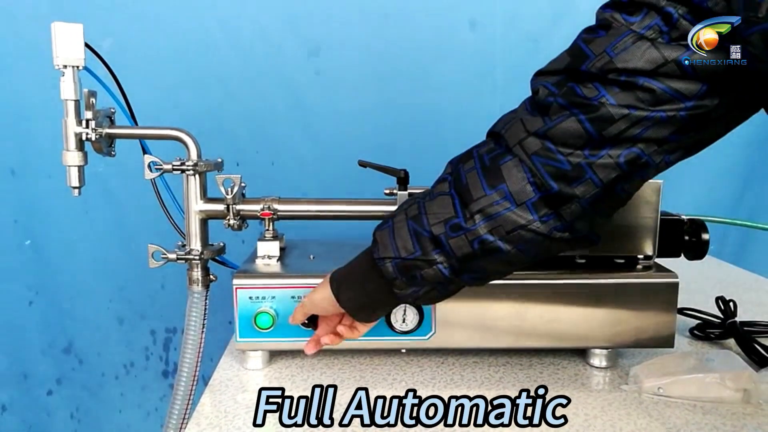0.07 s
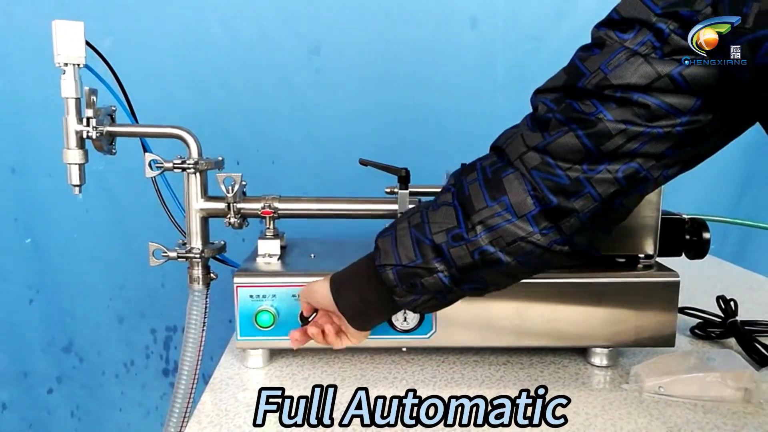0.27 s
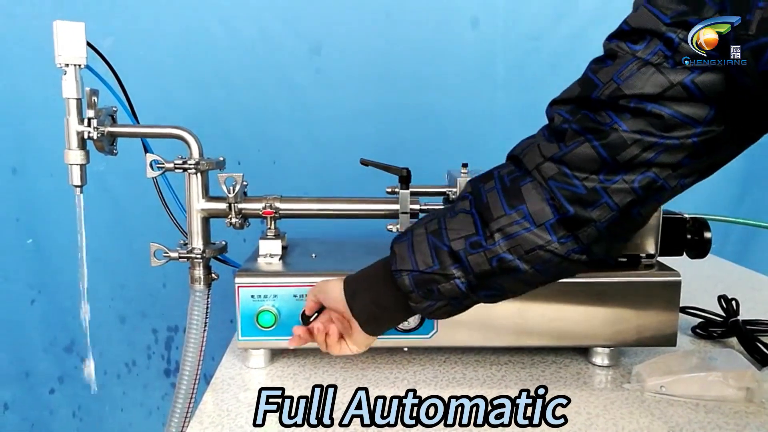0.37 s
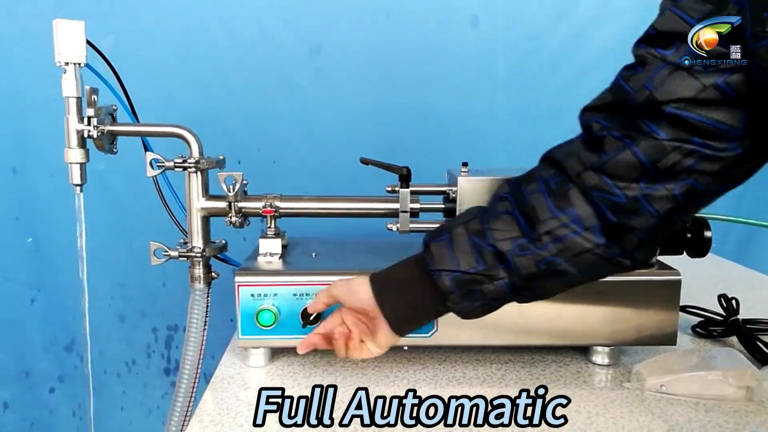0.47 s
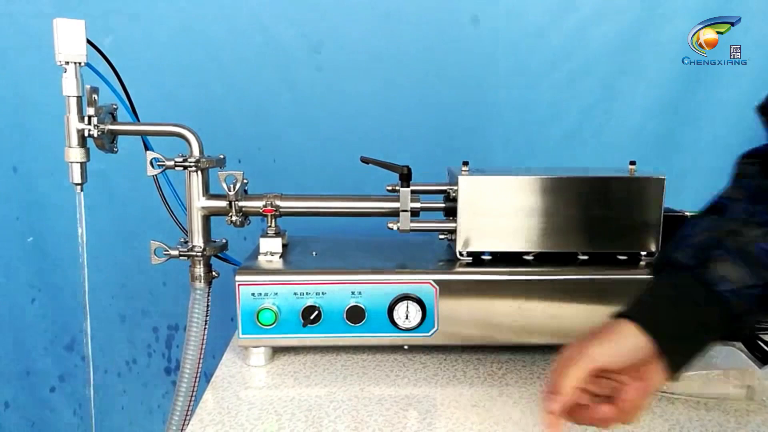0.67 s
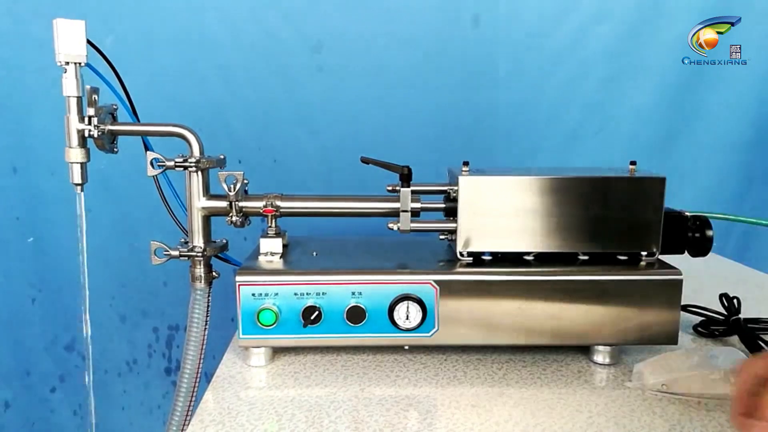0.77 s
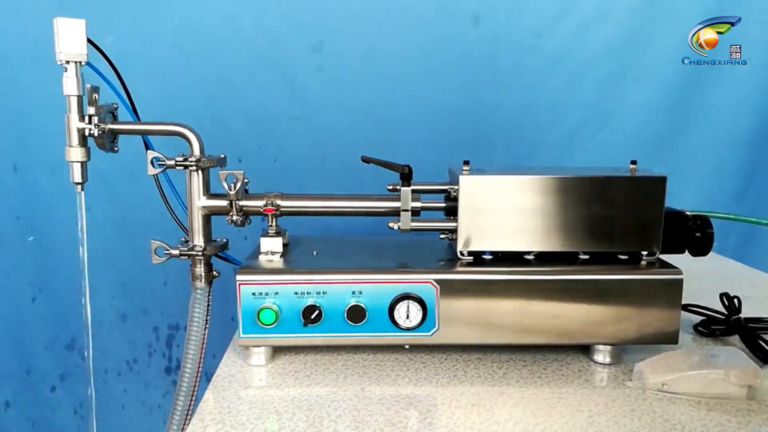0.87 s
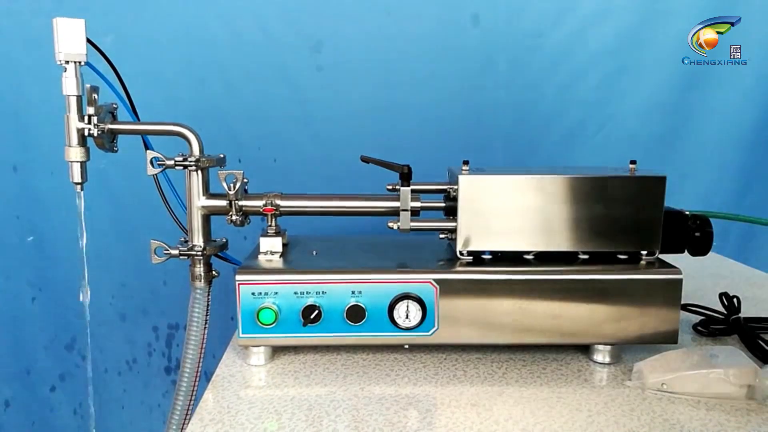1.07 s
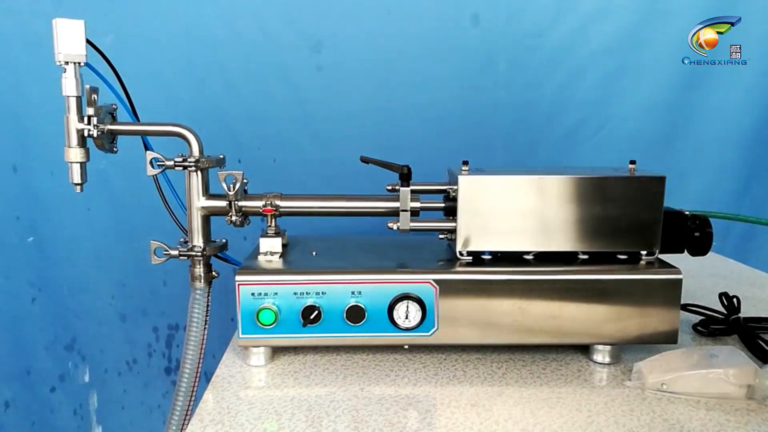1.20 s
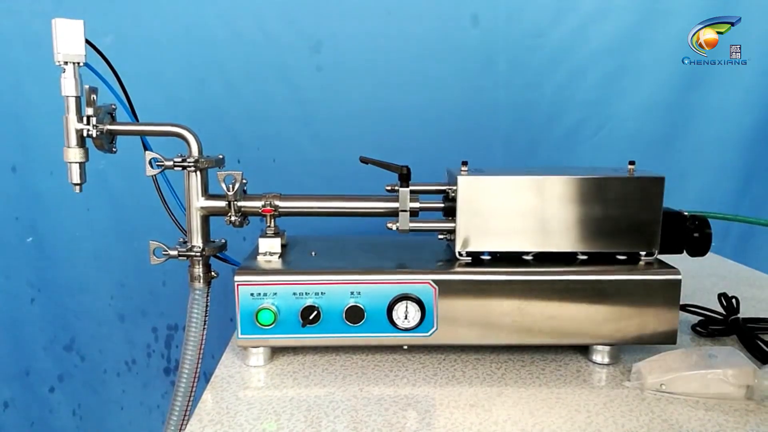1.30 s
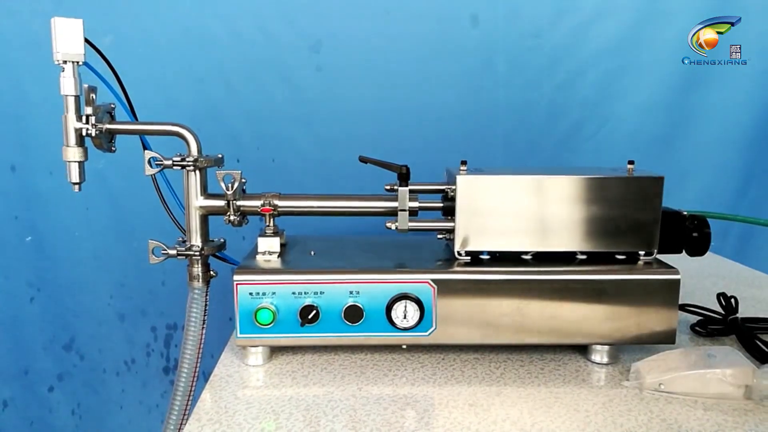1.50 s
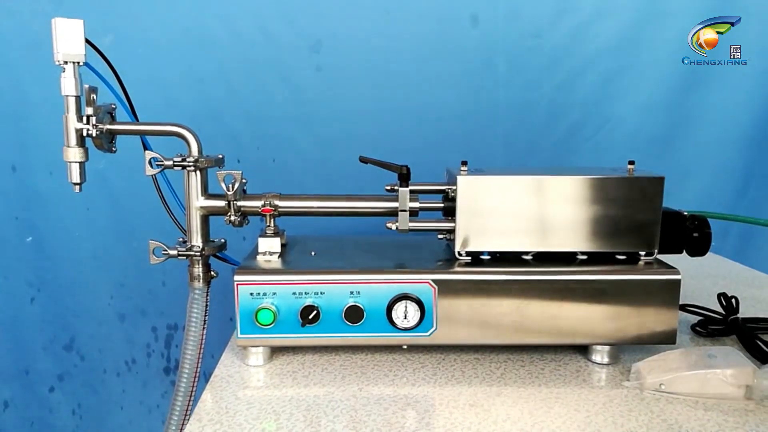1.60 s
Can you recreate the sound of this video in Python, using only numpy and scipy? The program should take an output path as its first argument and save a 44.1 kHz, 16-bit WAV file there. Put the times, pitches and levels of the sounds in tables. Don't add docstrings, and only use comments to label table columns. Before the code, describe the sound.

Compressed air hisses from a benchtop piston filling machine, close up in a quiet room. After near silence, at 0.25 seconds a sharp air burst and piston slam thud into the bench, steel pinging. Steady bright hiss continues over faint liquid patter, dips near 1.0 with a small valve tick, then a second slam and burst at 1.09 leads into a ringing, slightly whistling hiss, the splashing ending around 1.4.

```python
import sys
import numpy as np
from scipy import signal
from scipy.fft import rfft, irfft
from scipy.io import wavfile
from scipy.ndimage import uniform_filter1d

SR = 44100
rng = np.random.default_rng(int(sys.argv[2]) if len(sys.argv) > 2 else 0)


def rack_gain(trim_db):
    fader = np.asarray(trim_db, float)
    return 10 ** (fader / 20)


def pcm_store(signal):
    levels = np.round(np.clip(np.atleast_2d(signal), -1, 1) * 32767)
    wavfile.write(sys.argv[1], SR, levels.astype(np.int16).T)


N = 72765
T = np.arange(N) / SR

# f/Hz, level/dB
ROOM_COLOUR = [(20, -7), (35, -6.5), (60, -11), (250, -18), (1000, -16), (2500, -19.5), (4500, -28),
               (10000, -37)]
# f/Hz, level/dB
ROOM_HUMS = [(541, -77), (1240, -88), (1615, -85)]
# f/Hz, level/dB
PATTER_COLOUR = [(100, -47.5), (200, 2), (300, -10.5), (450, -4), (680, -9), (900, 2), (1300, -39),
                 (2000, -47)]
# t/s, level/dB, length/s, centre f/Hz
SPLASHES = [(0.297, -47.5, 0.15, 890), (0.478, -62, 0.069, 245), (0.594, -59.5, 0.076, 222),
            (0.673, -61, 0.22, 333), (0.828, -53.5, 0.067, 244), (0.835, -52, 0.067, 760),
            (0.868, -57.5, 0.06, 610), (0.965, -51, 0.043, 765), (1.035, -56, 0.176, 373),
            (1.139, -46, 0.072, 970), (1.257, -56, 0.11, 270), (1.267, -61, 0.088, 820),
            (1.326, -57.5, 0.14, 265), (1.025, -64, .06, 201), (0.703, -62, 0.086, 720),
            (1.407, -68.5, 0.092, 266)]
# t/s, level/dB, f/Hz, length/s
BENCH_REBOUNDS = [
    (0.24, -34.5, 176, 0.011),
    (0.263, -42, 254, 0.034),
    (0.288, -38, 257, 0.02),
    (1.072, -47, 245, 0.028),
    (1.103, -42, 257, 0.02),
    (1.127, -34, 233, 0.013),
    (1.139, -38, 246, 0.024),
    (1.156, -51, 248, 0.018),
]
# t/s, level/dB, f/Hz, t60/s
VALVE_PINGS = [(.2535, -29, 1950, .04), (.256, -33, 800, .03), (.2667, -20, 2550, .03),
               (.2775, -28, 2550, .04), (.283, -28, 2520, .07), (.303, -32, 2550, .04),
               (.308, -37, 900, .06), (1.0928, -20, 1480, .032), (1.096, -28, 2200, .06),
               (1.109, -32, 1930, .06), (1.125, -29, 1420, .04), (1.129, -31, 1915, .12),
               (1.136, -33, 1915, .07)]
# t/s, thud level/dB, bench f/Hz, crack level/dB
PISTON_SLAMS = [
    (.2533, -20, 228, -27),
    (1.0925, -20.5, 228, -29),
]
# f/Hz, level/dB
BENCH_COLOUR = [(60, -15), (130, -1.5), (200, -1.5), (260, 6), (330, -18), (500, -24.5), (900, -20),
                (1500, -43)]
# f/Hz, level/dB, t60/s
STEEL_MODES = [(524, -3, 0.036), (730, -3, 0.039), (1970, 0, 0.05), (2750, -4, .045), (3920, 7, 0.069),
               (4370, -8, .05), (5100, -3, .09), (5400, 3, 0.088)]
# t/s, level/dB
EXHAUST_FLOW = [(.21, -72), (.235, -55.5), (.27, -41), (.55, -41), (.7, -39.5), (.985, -39.5),
                (1.005, -44.5), (1.07, -47), (1.1, -37.5), (1.3, -41.5), (1.65, -42.5)]
# f/Hz, level/dB
PUSH_COLOUR = [(530, -28), (900, -8), (1840, -3), (2120, -6), (3340, -7.5), (5370, -8.5), (7150, -13.5),
               (11900, -19), (15500, -24)]
# f/Hz, level/dB
PULL_COLOUR = [(530, -43), (900, -12), (1470, -2), (2720, 2.5), (3220, -4), (5370, 1), (7500, -7),
               (13600, -14.5), (15500, -20.5)]
# f/Hz, width/Hz, level/dB
PUSH_RESONANCES = [(1290, 50, -8), (1500, 100, -5), (2130, 80, -1), (2500, 120, -8), (2760, 110, -1),
                   (3920, 80, -5), (4290, 200, -3), (5350, 240, -5), (6280, 60, -11), (7770, 200, -15),
                   (9400, 800, -12), (11900, 900, -15)]
# f/Hz, width/Hz, level/dB
PULL_RESONANCES = [(1502, 37, 4), (2140, 44, 0.5), (2276, 29, 0.5), (2690, 80, 3.5), (2776, 35, 6),
                   (4015, 44, -0.5), (4340, 57, -5), (4580, 65, -1), (5400, 45, -0.5), (5420, 125, 2),
                   (6187, 70, 0.5), (9200, 770, -10), (11630, 740, -8.5), (13260, 1600, -11)]
# slam t/s, lead/s, lead-in level/dB, peak level/dB, hold/s
VALVE_BLASTS = [
    (0.2511, 0.021, -9, -22.5, 0.012),
    (1.0946, 0.022, -12, -24.5, 0.0059),
]
# f/Hz, level/dB
BLAST_COLOUR = [(180, -32), (300, 7.5), (769, -9), (2520, -6), (4800, -15.5), (5390, -3), (7140, -10.5),
                (11700, -24), (15500, -10)]
# f/Hz, width/Hz, level/dB
BLAST_RESONANCES = [(1650, 240, -2.5), (2680, 360, -4.5), (4100, 600, -2.5), (5290, 230, 4.5),
                    (9370, 1570, -1.5), (12000, 2550, -1.5), (13600, 1600, -8)]
# f/Hz, left minus right level/dB
LEFT_MINUS_RIGHT = [(400, -7.5), (700, -5), (1000, -12.5), (1400, -2.5), (2400, -8.5), (4300, -5), (5500, -16.5),
                    (7500, -51), (15000, -43)]
# t/s, centre f/Hz, depth/dB
CARRIAGE_NOTCH = [(.36, 600, -15), (.43, 546, 16), (0.551, 486, 14), (.6, 590, 2.5), (.67, 596, 2.5),
                  (.78, 820, 13), (.82, 814, 0), (.9, 905, 1.5), (.94, 950, 2), (1.0, 1050, 2.5),
                  (1.201, 586, -1), (1.28, 595, 7), (1.36, 610, 0), (1.5, 595, -4)]


def read(points, hz):
    f, value = np.transpose(points)
    return np.interp(np.log(hz + 1), np.log(f + 1), value)


def evened(x):
    return x / np.sqrt(np.mean(x ** 2) + 1e-20)


def drift(shape, size):
    return evened(uniform_filter1d(rng.standard_normal(shape), size=size))


def colour(x, points):
    gain = rack_gain(read(points, np.fft.rfftfreq(x.shape[-1], 1 / SR)))
    return irfft(rfft(x) * gain, x.shape[-1])


def scattered(x):
    longest_s = 0.002
    hz = np.fft.rfftfreq(2 * N, 1 / SR)
    delay = longest_s * np.interp(hz, np.linspace(0, SR / 2, 300), rng.random(300))
    phase = -2 * np.pi * np.cumsum(delay) * hz[1]
    left = irfft(rfft(x[0], 2 * N) * np.exp(1j * phase) * rack_gain(read(LEFT_MINUS_RIGHT, hz)))[:N]
    return rack_gain(3.5) * np.array([left, x[1]])


def hollowed(x):
    width_octaves = 0.3
    hz, t, z = signal.stft(x, SR, nperseg=1024)
    s, centre, depth_db = np.transpose(CARRIAGE_NOTCH)
    away = np.log2((hz[:, None] + 1) / np.interp(t, s, centre)) / width_octaves
    notch_db = np.interp(t, s, np.maximum(depth_db, 0)) * np.exp(-away ** 4)
    return signal.istft(z * rack_gain(-notch_db), nperseg=1024)[1][:, :N]


def room():
    level_db, hum_fade_db_per_s = -69.5, 12
    hum = np.zeros((2, N))
    for hz, db in ROOM_HUMS:
        hum += rack_gain(db + 3) * np.sin(2 * np.pi * (hz * T + rng.random((2, 1)) * 0.1))
    hum *= rack_gain(-hum_fade_db_per_s * np.maximum(T - VALVE_BLASTS[0][0], 0))
    noise = rng.standard_normal((3, N))
    low = colour(noise[2] - noise[:2], [(80, 0), (130, -30)])
    return rack_gain(level_db + 2.5) * evened(colour(noise[:2] + low, ROOM_COLOUR)) + hum


def liquid():
    patter_db, start_s, end_s = -59.5, 0.25, 1.347
    lumps = rack_gain(4.0 * drift((2, N), 900))
    out = rack_gain(patter_db) * evened(colour(rng.standard_normal((2, N)), PATTER_COLOUR)) * lumps
    out *= np.clip((T - start_s) / 0.02, 0, 1) * rack_gain(-120 * np.maximum(T - end_s, 0))
    for s, db, length, hz in SPLASHES:
        band = [(hz / 2.2, -25), (hz / 1.2, 0), (hz * 1.2, 0), (hz * 1.8, -25)]
        noise = rng.standard_normal((3, N))
        noise = evened(colour(noise[:2] + noise[2], band))
        u = np.maximum((T - s) / length + 0.23, 0) * 4
        out += rack_gain(db + 7.5) * noise * u * np.exp(-u)
    return out


def rebounds():
    out = np.zeros(N)
    for s, db, hz, length in BENCH_REBOUNDS:
        pulse = np.sin(np.pi * np.clip((T - s) / length, 0, 1)) ** 2
        out += rack_gain(db) * pulse * np.sin(2 * np.pi * hz * (T - s))
    return out


def pings():
    rise_s, left_db, right_db = 0.0012, -7, 2
    out = np.zeros(N)
    for s, db, hz, t60 in VALVE_PINGS:
        u = np.maximum(T - s, 0)
        out += (1 - np.exp(-u / rise_s)) * rack_gain(db - 60 * u / t60) * np.sin(2 * np.pi * hz * u)
    return out * rack_gain([[left_db], [right_db]])


def thuds():
    length_s, lag_s, tail_db = 0.013, 0.0008, -17
    tail_t60, late_db, late_t60 = 0.2, -10, 0.75
    puff_s, puff_db, puff_length_s = 0.234, -42, 0.03
    noise = rng.standard_normal((3, N))
    boom = evened(colour(noise[2] + 0.71 * noise[:2], BENCH_COLOUR))
    out = np.zeros((2, N))
    for s, db, hz, _ in PISTON_SLAMS:
        u = np.maximum(T - s, 0)
        pulse = np.sin(np.pi * np.clip(u / length_s, 0, 1) ** 0.7) ** 1.6
        out += rack_gain(db) * pulse * np.sin(2 * np.pi * hz * (u - lag_s))
        decay = rack_gain(-60 * u / tail_t60) + rack_gain(late_db - 60 * u / late_t60)
        out += rack_gain(db + tail_db) * boom * np.minimum(u / length_s, 1) ** 2 * decay
    return out + rack_gain(puff_db) * np.sin(np.pi * np.clip((T - puff_s) / puff_length_s, 0, 1)) ** 2


def ring(x):
    t = np.arange(SR // 2) / SR
    modes = sum(rack_gain(db - 60 * t / t60) * np.sin(2 * np.pi * hz * t) for hz, db, t60 in STEEL_MODES)
    return signal.fftconvolve(x, modes)[:N]


def cracks():
    out = np.zeros(N)
    for s, _, _, crack_db in PISTON_SLAMS:
        u = np.maximum(T - s, 0)
        knock = (u > 0) * np.exp(-u / 0.00061) * rng.standard_normal(N)
        steel = ring(knock)
        out += rack_gain(crack_db) * (steel / abs(steel).max() + 0.4 * knock)
    return out


def valve_tick():
    tick_s, db, t60 = 1.0235, -29, 0.014
    u = np.maximum(T - tick_s, 0)
    tick = np.minimum(u / 0.0014, 1) * rack_gain(db - 60 * u / t60) * rng.standard_normal(N)
    return colour(tick, [(1500, -8), (6000, -8), (9000, 0), (14000, -3)])


def air(base, rings, ring_db, patch_db, low_hz):
    alike, wander_hz, wander_db, ripple_db = 0.55, 10, 1.2, 1.6
    frames, hz = N // 256 + 5, np.fft.rfftfreq(1024, 1 / SR)[:, None]
    a, b, c, d, p, q = rng.standard_normal((frames, 513, 6)).T
    patches = evened(uniform_filter1d(uniform_filter1d(p, size=6, axis=0), size=8, axis=1))
    ripple = evened(uniform_filter1d(q, size=30, axis=1))
    power = rack_gain(2 * read(base, hz)) / (1 + (low_hz / (hz + 1)) ** 8)
    for f, width, db in rings:
        wander = rng.standard_normal((frames, 2))
        shift, swell = evened(uniform_filter1d(wander, size=16, axis=0)).T
        away = 2 * (hz - f - wander_hz * shift) / (abs(width) + 35)
        power = power + rack_gain(2 * (db + ring_db + wander_db * swell)) / (1 + away ** 2) ** 1.5
    right = a + 1j * b
    left = alike * right + np.sqrt(1 - alike ** 2) * (c + 1j * d)
    z = np.array([left, right]) * np.sqrt(power) * rack_gain(patch_db * patches + ripple_db * ripple)
    return evened(signal.istft(z, nperseg=1024, noverlap=768)[1][:, :N])


def exhaust():
    turn_s, flicker_db, ring_db, patch_db = 1.09, -0.6, 6, 1.5
    bright = 0.44
    turn = np.clip((T - turn_s) / 0.011, 0, 1)
    push = air(PUSH_COLOUR, PUSH_RESONANCES, ring_db, patch_db, 1400)
    pull = air(PULL_COLOUR, PULL_RESONANCES, ring_db, patch_db, 1000)
    hiss = (1 - turn) * push + turn * pull
    db = np.interp(T, *np.transpose(EXHAUST_FLOW), left=-130) + flicker_db * drift(N, 500)
    low = colour(hiss, [(5500, 0.0), (7000, -33)])
    return rack_gain(db) * (low + (hiss - low) * rack_gain(bright * np.minimum(db + 45, 0)))


def blasts():
    t60, linger_db, linger_t60 = 0.11, -17, 0.66
    env = np.zeros(N)
    for s, lead, lead_db, db, hold in VALVE_BLASTS:
        u = np.maximum(T - s - hold, 0)
        decay = rack_gain(-60 * u / t60) + rack_gain(linger_db - 60 * u / linger_t60)
        v = np.clip((T - s + lead) / lead, 0, 1)
        swell = np.clip(v / 0.4, 0, 1) ** 2 * (0.5 + 0.5 * v)
        burst = np.clip((T - s) / 0.002, 0, 1)
        env += rack_gain(db) * decay * (rack_gain(lead_db) * swell + (1 - rack_gain(lead_db)) * burst)
    sputter = rack_gain(1.8 * drift(N, 40))
    return env * sputter * air(BLAST_COLOUR, BLAST_RESONANCES, -3, 1.6, 508)


def scene():
    room_fade = rack_gain(-19 * np.maximum(T - 1.47, 0))
    shadowed = scattered(exhaust() + blasts() + cracks() + valve_tick())
    knocks = thuds() + rebounds() + pings()
    return hollowed(shadowed + knocks + liquid() * rack_gain([[-2], [2]]) + room() * room_fade)


def treble_dropouts(x):
    threshold, from_hz, top_extra = 1.4, 6000, 1.5
    hz, _, z = signal.stft(x, SR, nperseg=1024)
    hz = hz[:, None]
    chance = uniform_filter1d(rng.standard_normal((z.shape[2], 103, 2)), size=4, axis=0).T
    chance = evened(chance + 0.15 * rng.standard_normal((103, 1)))
    chance = chance.repeat(5, axis=1)[:, :513]
    chance = chance + top_extra * np.clip((hz - 12500) / 2800, 0, 1) ** 2
    loud = 10 * np.log10((abs(z) ** 2).sum(1, keepdims=True) + 1e-12)
    chance = chance - np.maximum(loud - np.median(loud) - 3, 0) / 3
    kept = 1 / (1 + np.exp(12 * (chance - threshold)))
    z = z * kept ** np.clip((hz - from_hz) / 800, 0, 1)
    return signal.istft(z, nperseg=1024)[1][:, :N]


def low_pass(x):
    return signal.sosfilt(signal.butter(12, 15600, fs=SR, output="sos"), x)


def record(dry):
    left = rack_gain(-33 * np.maximum(T - 1.42, 0))
    both = treble_dropouts(dry * np.array([left, np.ones(N)]))
    band_limit = signal.firwin(1023, 15330, fs=SR)[None]
    return low_pass(signal.oaconvolve(both, band_limit, "same", axes=1))


dry = scene()
out = record(dry)
pcm_store(out)
```